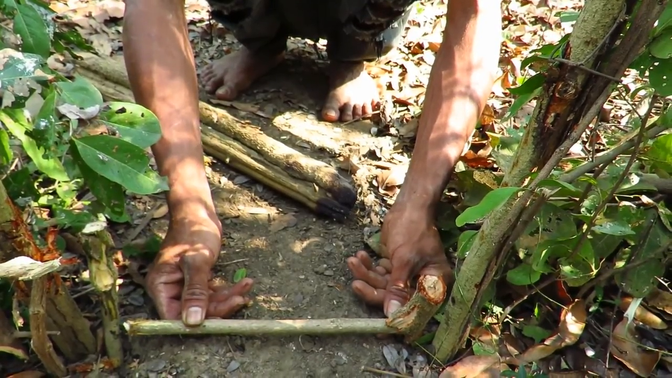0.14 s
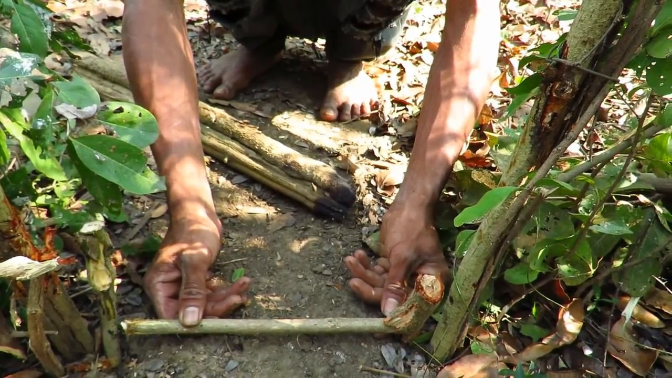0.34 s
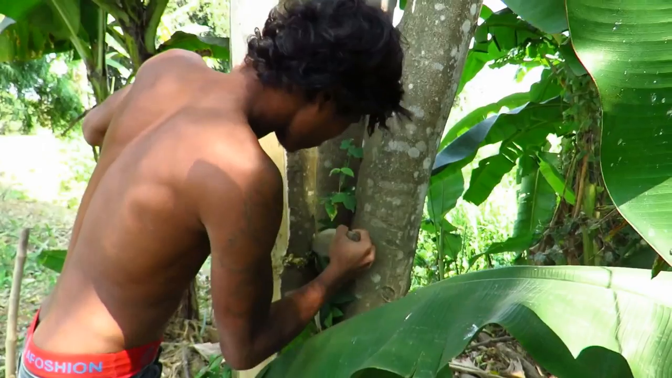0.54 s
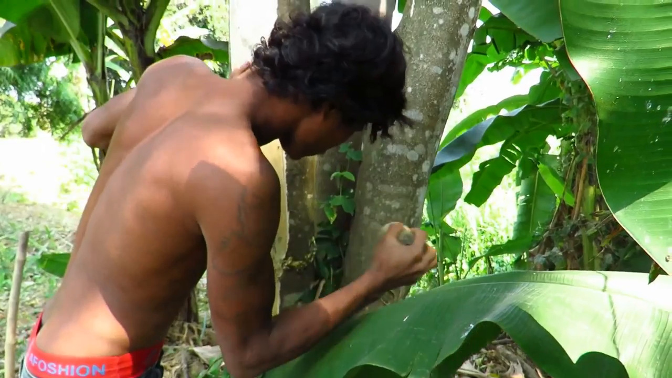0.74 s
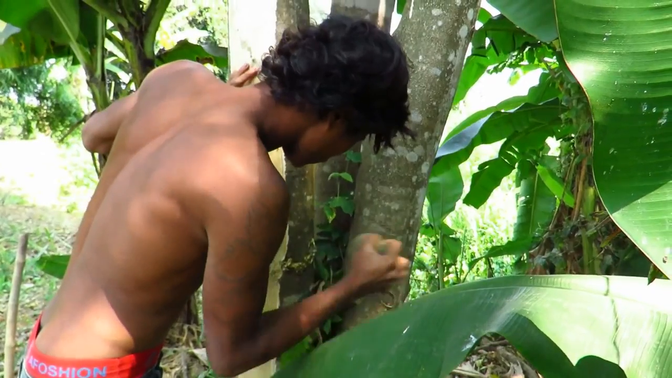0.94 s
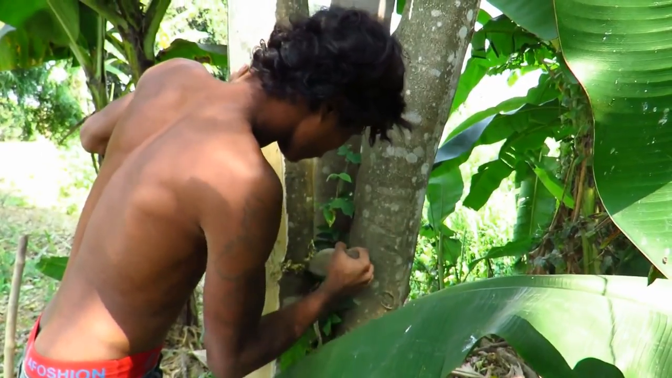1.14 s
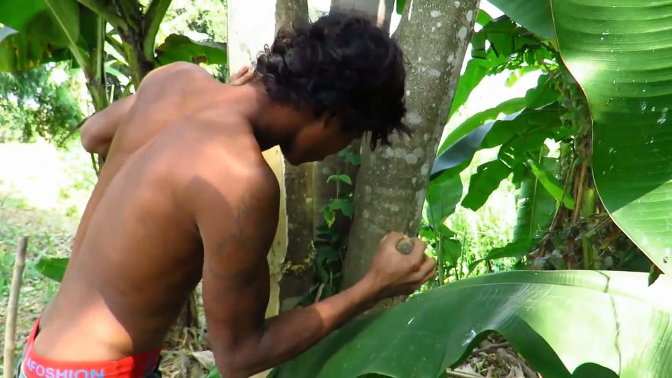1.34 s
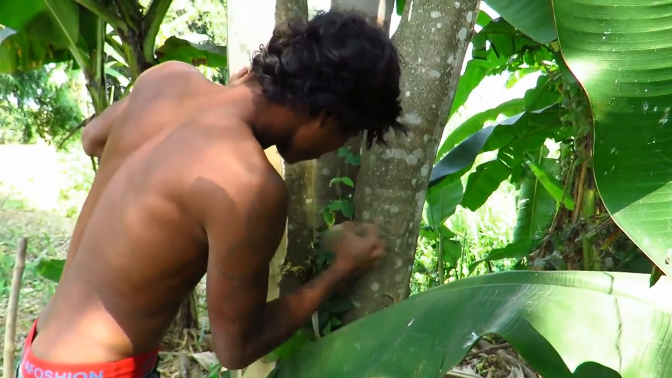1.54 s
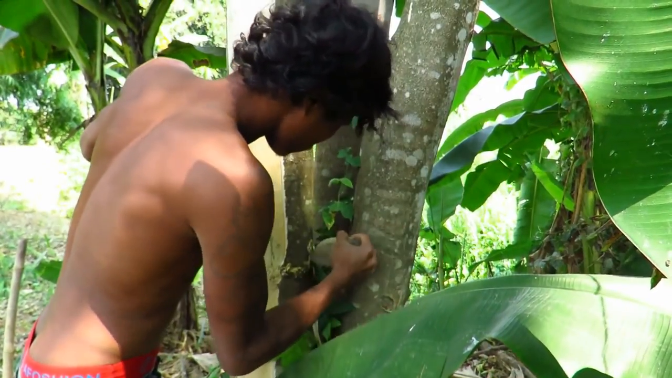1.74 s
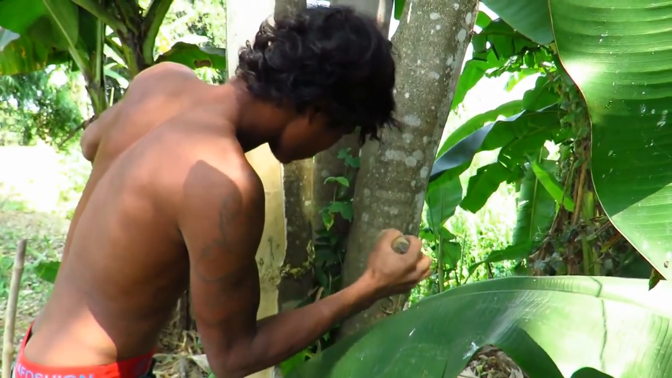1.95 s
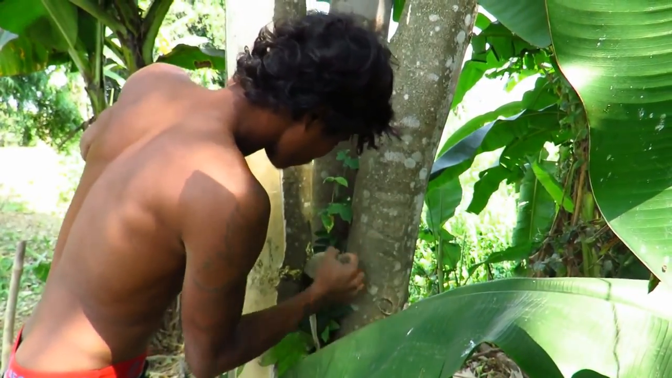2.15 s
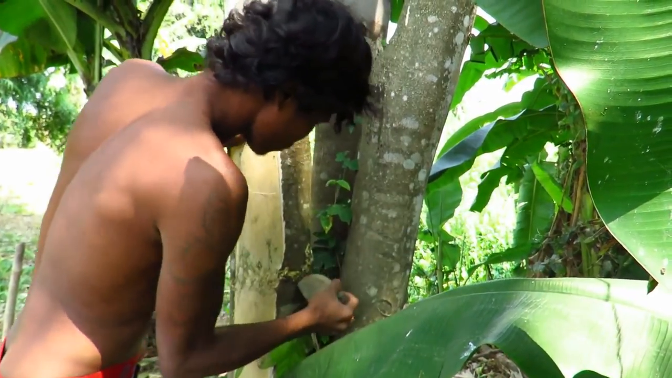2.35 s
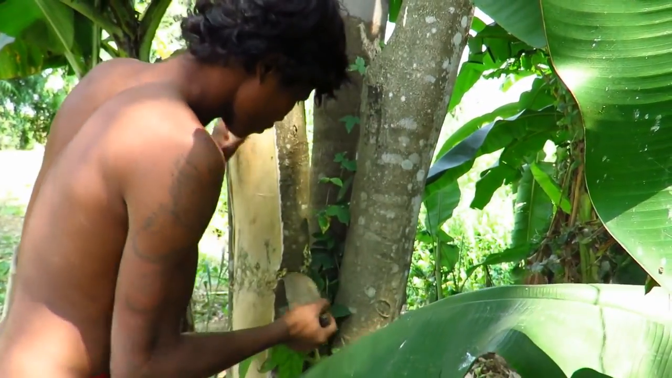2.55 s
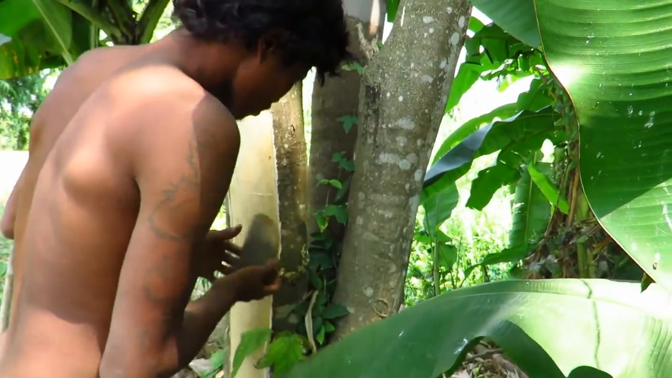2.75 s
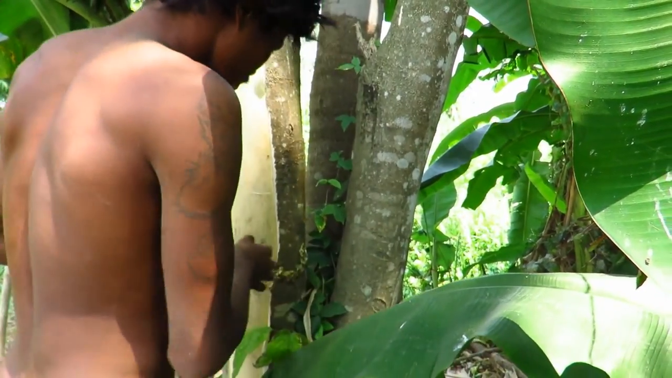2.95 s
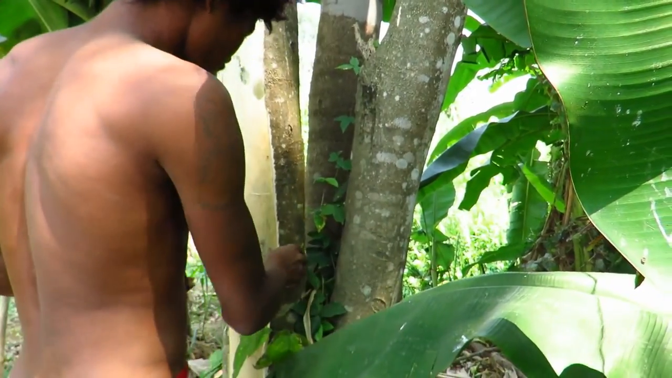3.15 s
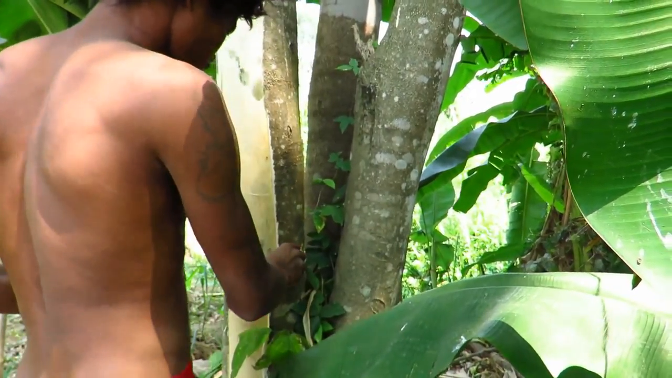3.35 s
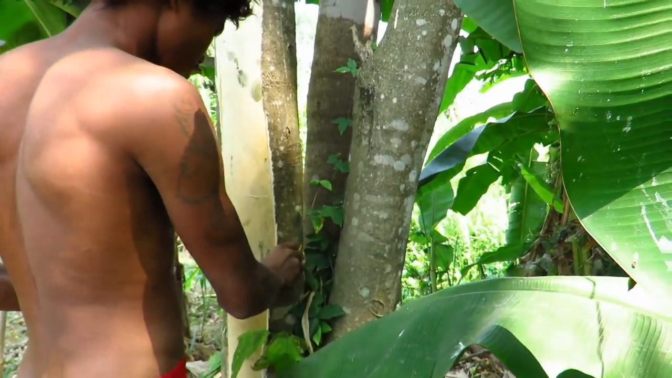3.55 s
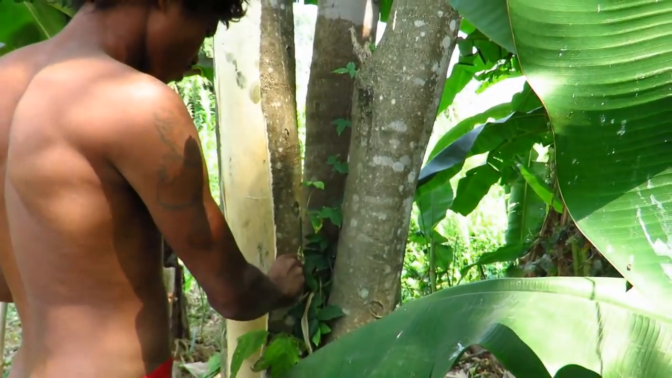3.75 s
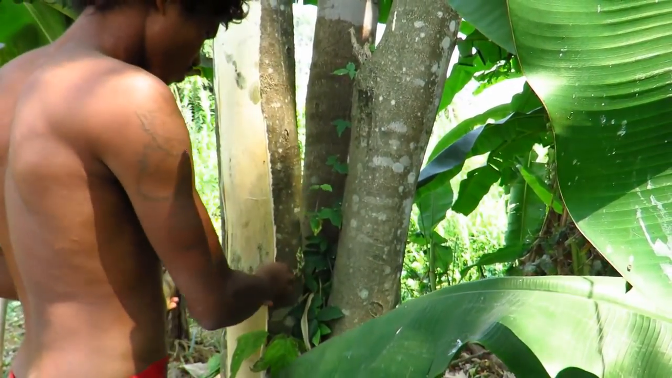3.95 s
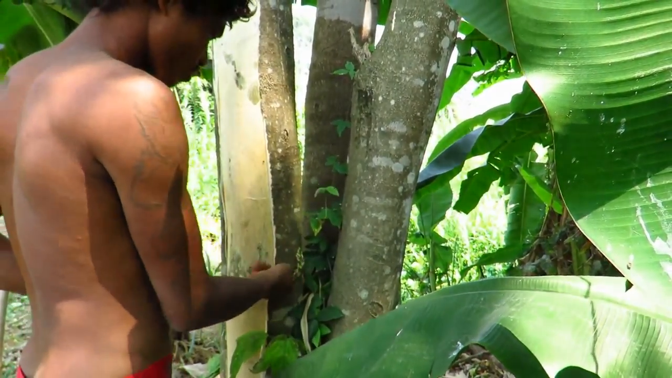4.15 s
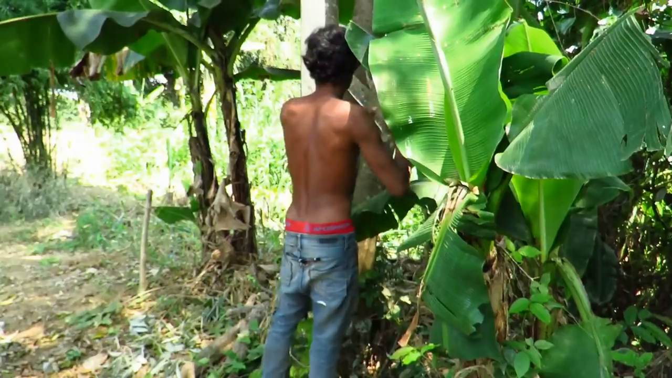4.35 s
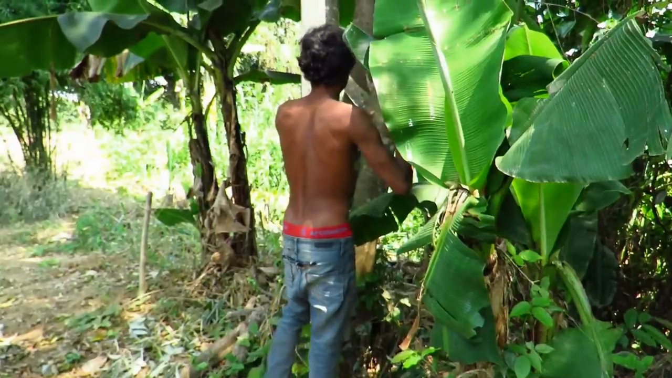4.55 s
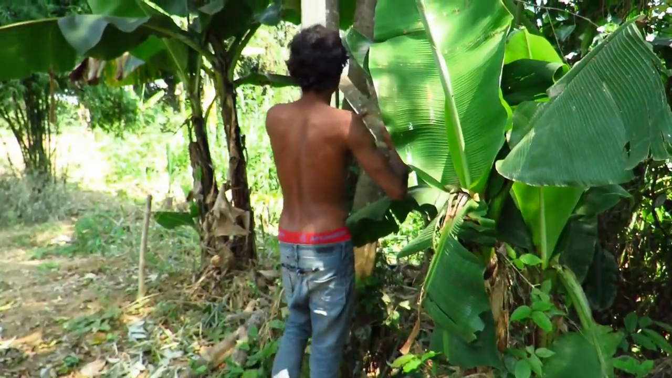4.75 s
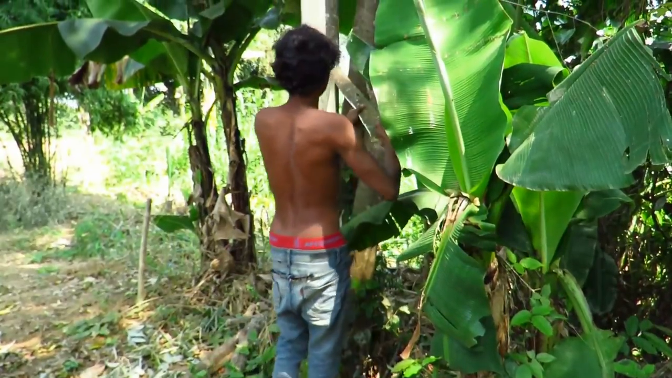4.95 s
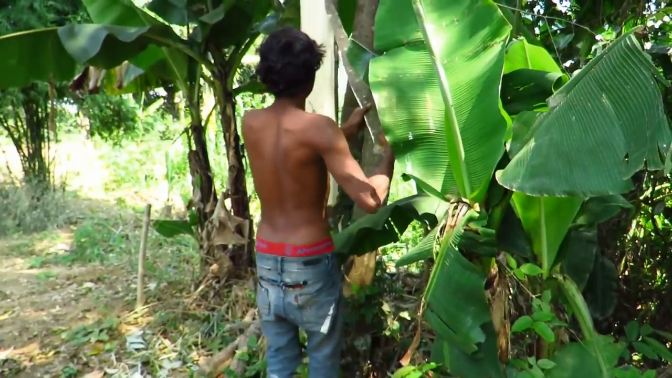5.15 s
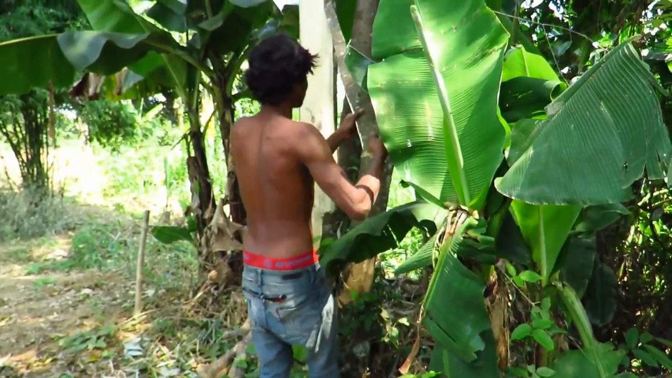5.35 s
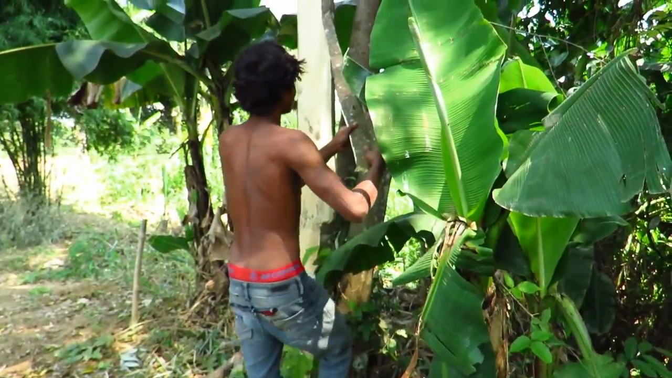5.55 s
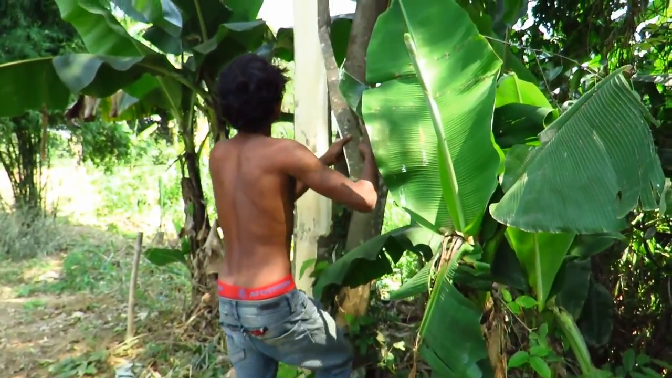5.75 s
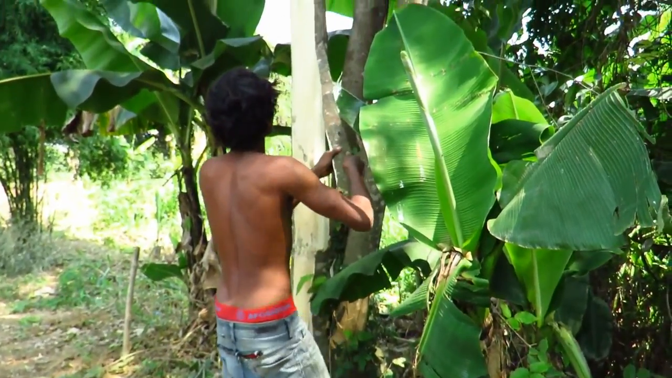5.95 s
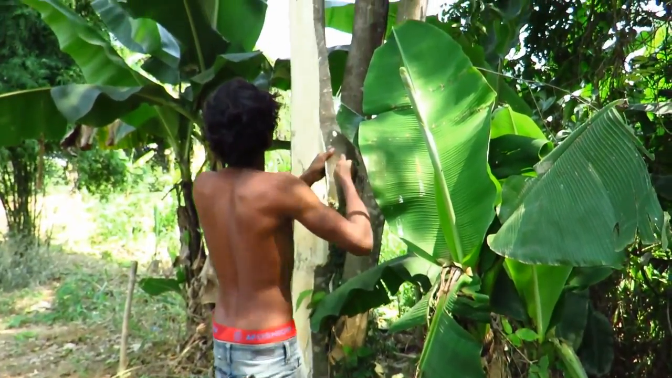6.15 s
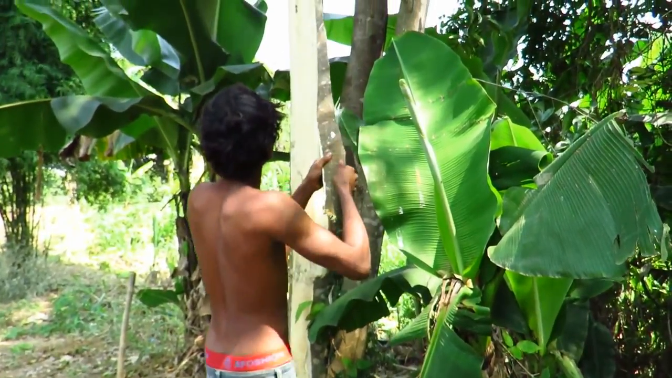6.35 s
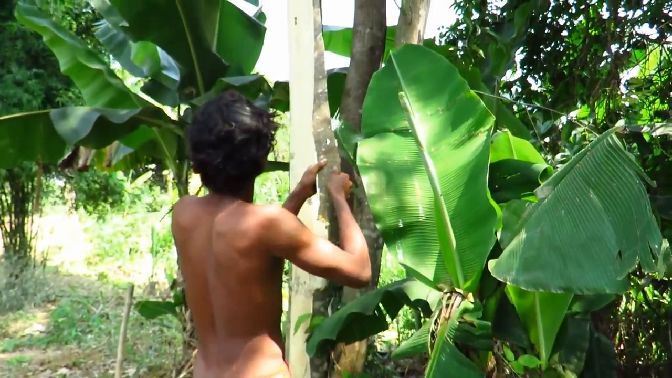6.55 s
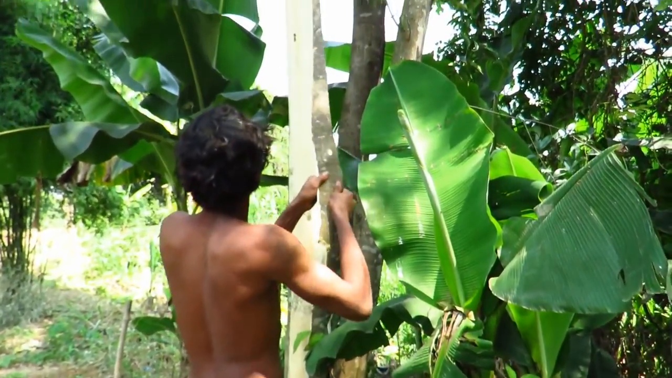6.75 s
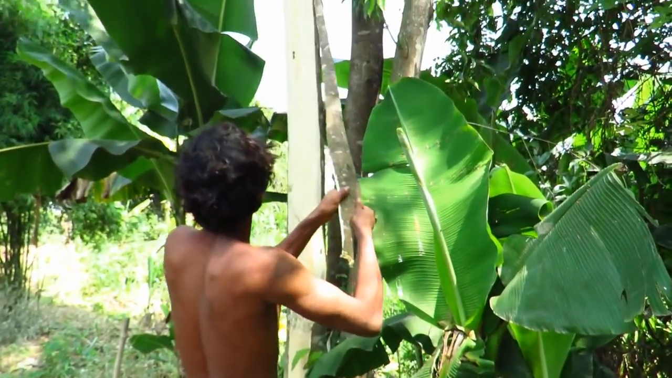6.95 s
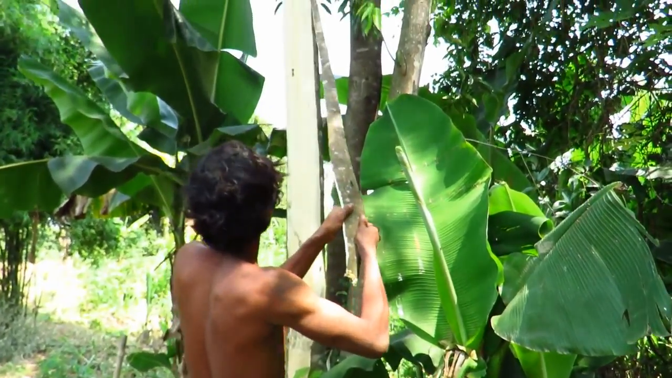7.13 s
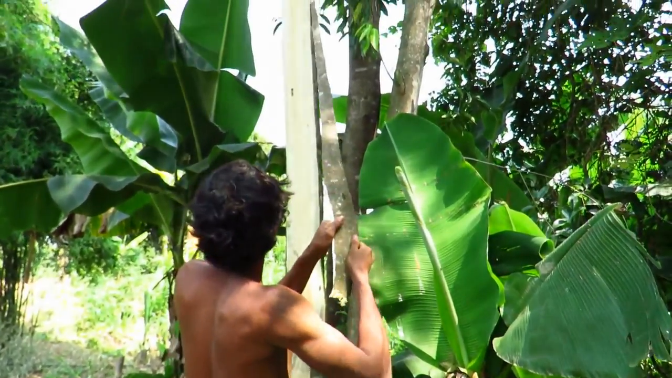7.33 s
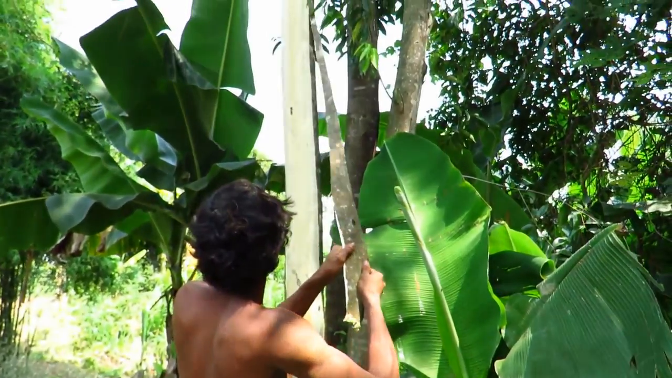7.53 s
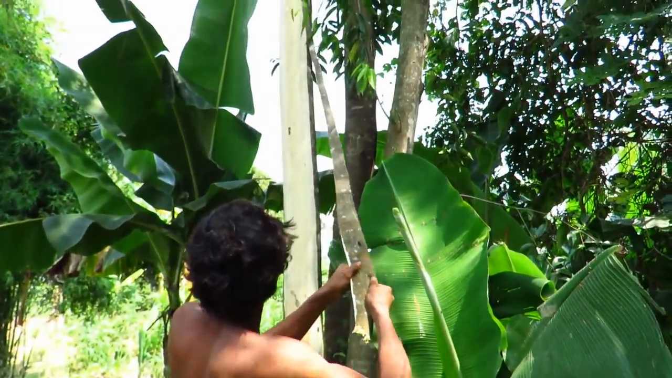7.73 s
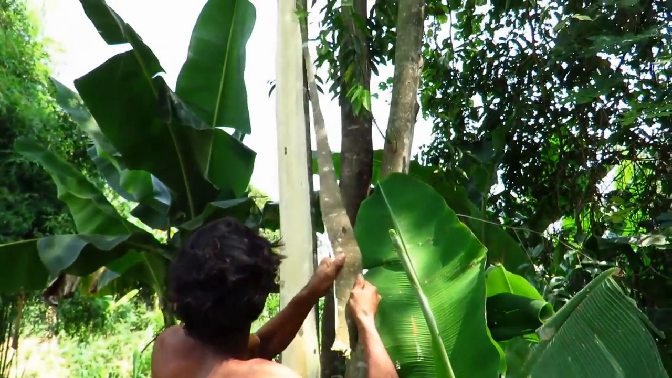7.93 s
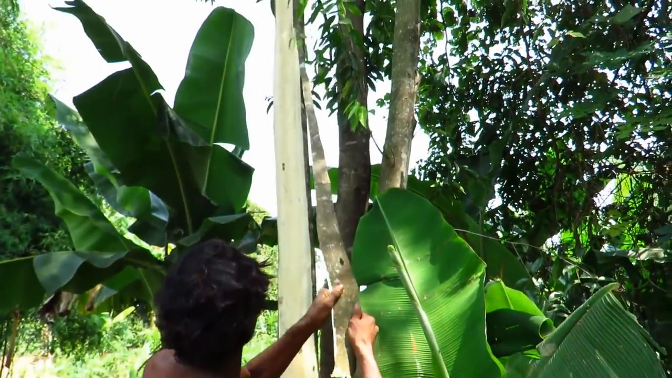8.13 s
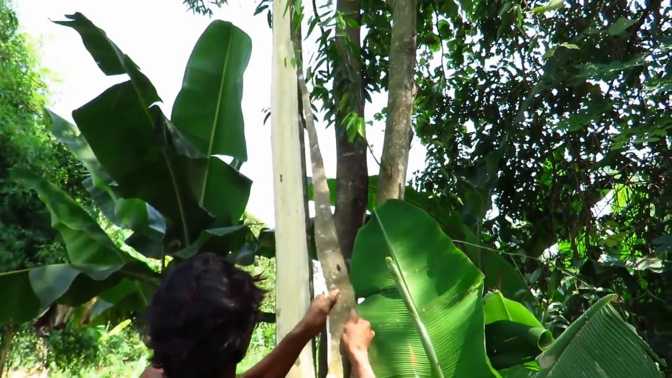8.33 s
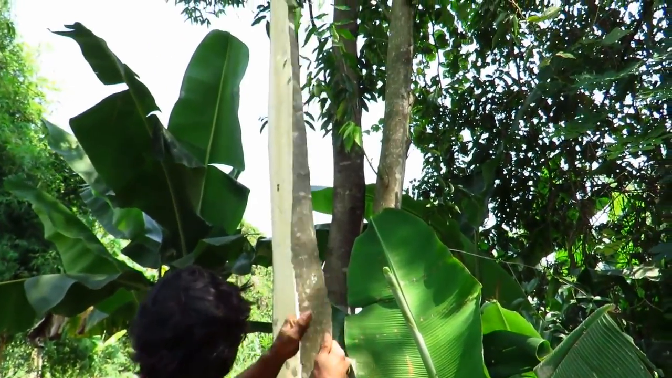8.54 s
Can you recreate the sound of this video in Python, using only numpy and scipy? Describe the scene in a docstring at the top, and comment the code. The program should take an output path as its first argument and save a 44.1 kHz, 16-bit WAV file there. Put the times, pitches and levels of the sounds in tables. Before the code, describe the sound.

A hand-held stone thuds four times into a trunk among trees, followed by crisp bark cricks and seven snapping, tearing pulls over faint insects.

```python
"""Stone blade and bark in the woods

After a short opening and a cut, a hand-held stone blade chops four times into a standing trunk ahead;
neighbouring trees throw the thuds back. Dry pieces crick as the bark is prised loose, then it rips upwards
in seven pulls of snapping fibres. Leaves hiss, insects shrill near 7 kHz, light wind bumps the microphone.
Blows are damped sines and short noise, tears are uneven impulses; loud blows turn the gain down."""
import sys
import numpy as np
from scipy import signal
from scipy.fft import rfft, irfft, next_fast_len
from scipy.io import wavfile
from scipy.ndimage import uniform_filter1d, minimum_filter1d, map_coordinates

SR = 44100
rng = np.random.default_rng(int(sys.argv[2]) if len(sys.argv) > 2 else 0)


def waveform_to_disk(signal):
    """Save audio, clipped to [-1, 1], as 16-bit WAV at the path in sys.argv[1]."""
    frames = np.transpose(np.atleast_2d(signal))
    scaled = np.clip(frames, -1, 1) * 32767
    samples = np.round(scaled).astype(np.int16)
    wavfile.write(sys.argv[1], SR, samples)


N = 383229  # samples, 8.69 s


def amp(db):
    """Decibels to gain."""
    return 10 ** (np.asarray(db) / 20)


def unit(x):
    """Scaled to rms 1."""
    return x / np.sqrt(np.mean(x ** 2) + 1e-20)


def along(points, hz):
    """(frequency [Hz], value) points read on a log frequency axis."""
    f, v = np.transpose(points)
    return np.interp(np.log(hz + 1), np.log(f + 1), v)


def level_curve(points):
    """A gain per sample through (time [s], level [dB]) points, silent outside them."""
    s, db = np.transpose(points)
    return amp(np.interp(np.arange(N) / SR, s, db, left=-np.inf, right=-np.inf))


def add(track, s, sound):
    """Mix a sound in at a time in seconds."""
    room = track[..., max(round(s * SR), 0):]
    count = min(room.shape[-1], sound.shape[-1])
    room[..., :count] += sound[..., :count]


def filtered(x, response):
    """x times a response of frequency."""
    m = next_fast_len(x.shape[-1] + SR // 5)
    spectrum = rfft(x, m) * response(np.fft.rfftfreq(m, 1 / SR))
    return irfft(spectrum, m)[..., :x.shape[-1]]


def coloured(x, points):
    """A causal, minimum-phase filter with the given (frequency [Hz], level [dB]) shape."""
    size = 4096
    shape = amp(along(points, np.fft.rfftfreq(size, 1 / SR)))
    cepstrum = irfft(np.log(np.maximum(shape, 1e-6)))
    # folding the cepstrum forward in time makes the filter causal
    cepstrum[1:size // 2] *= 2
    cepstrum[size // 2 + 1:] = 0
    return signal.oaconvolve(x, irfft(np.exp(rfft(cepstrum))))[:len(x)]


def hiss(points):
    """Coloured noise of rms 1."""
    return unit(coloured(rng.standard_normal(N), points))


def fade(t, t60):
    """An exponential decay, 60 dB down after t60 seconds."""
    return np.exp(-np.log(1000) * t / t60)


def ring(modes, t, pitch, attack):
    """Damped sines that swell over the contact time."""
    modes_sum = sum(amp(db) * np.sin(2 * np.pi * hz * pitch * t) * fade(t, t60) for hz, db, t60 in modes)
    return modes_sum * (1 - np.exp(-t / attack))


def crackle(count, rate, scatter_db, order):
    """Impulses at uneven gaps and sizes, rms 1; a higher order spaces them more evenly."""
    draws = rng.random((count // 8, order + 2))
    gaps = -np.log(draws[:, 2:]).mean(axis=1)
    at = np.cumsum(gaps) * SR / rate
    size = amp(scatter_db * draws[:, 0]) * np.sign(draws[:, 1] - .5)
    return unit(np.bincount(at[at < count].astype(int), size[at < count], count))


def burst(t, t60):
    """A short train of tiny breaks with an even spectrum and energy 1."""
    z = rfft(rng.standard_normal(len(t)) * fade(t, t60) * (1 - np.exp(-t / 0.00045)))
    power = np.abs(uniform_filter1d(np.abs(z) ** 2, size=160))
    even = irfft(z / np.sqrt(power + 1e-12), len(t))
    return even / np.linalg.norm(even)


def wobble(rate):
    """A smooth random curve, rate knots a second."""
    return map_coordinates(rng.standard_normal(400), [np.arange(N) * rate / SR], mode="wrap")


def scattered(x, t60):
    """x smeared by a short random ring of energy 1, which changes as the breaking point moves on."""
    hop, ring_size = SR // 60, SR // 40
    t = np.arange(ring_size) / SR
    pieces = np.pad(x, (0, -len(x) % hop)).reshape(-1, hop)
    tails = rng.standard_normal((len(pieces), ring_size)) * fade(t, t60)
    rung = signal.fftconvolve(pieces, tails / np.linalg.norm(tails, axis=1, keepdims=True), axes=1)
    at = hop * np.arange(len(rung))[:, None] + np.arange(rung.shape[1])
    return np.bincount(at.ravel(), rung.ravel())[:len(x)]


def spread(mid, side, alike):
    """Stereo from two unrelated signals, with a given likeness of left and right."""
    likeness = lambda hz: np.clip(along(alike, hz), 0, .999)
    side = filtered(side, lambda hz: np.sqrt((1 - likeness(hz)) / (1 + likeness(hz))))
    return np.array([mid + side, mid - side])


# distant foliage, swelling slowly: (time [s], level [dB])
LEAF_LEVELS = [(0, -55.5), (.47, -55), (.5, -52.5), (6, -51.5), (8.69, -48)]
# its dull hiss: (frequency [Hz], relative level [dB])
LEAF_COLOUR = [(20, -20), (45, -4.5), (150, -3.5), (420, -2.5), (900, -6.5), (1060, -5.5), (1300, -7.5),
               (3000, -12), (5500, -19), (8000, -25.5), (10000, -28), (13500, -32.5), (16000, -55)]
# likeness of left and right for sound from all around, read as 0 where negative: (frequency [Hz], likeness)
AROUND_ALIKE = [(60, 1), (180, -3.5), (550, -0.85), (1650, 0.68), (4970, 0.6), (15000, -0.088)]


def leaves():
    """Far leaves add up to a steady wide hiss."""
    level = level_curve(LEAF_LEVELS)
    return spread(level * hiss(LEAF_COLOUR), level * hiss(LEAF_COLOUR), AROUND_ALIKE)


# the shrill band of the insects: (frequency [Hz], relative level [dB])
INSECT_COLOUR = [(5200, -37.5), (6100, -3), (6600, 5), (6950, 3), (7400, -5.5), (8200, -56)]
INSECT_START_S, INSECT_DB, INSECT_GROWTH_DB_PER_S, INSECT_WAVER_DB = .5, -61.5, 0.29, 0.5


def insects():
    """A chorus too dense to tell apart: narrow-band noise that slowly grows and wavers."""
    t = np.arange(N) / SR
    swell = amp(INSECT_DB + INSECT_GROWTH_DB_PER_S * t + INSECT_WAVER_DB * wobble(2.23))
    level = (t > INSECT_START_S) * swell
    return spread(level * hiss(INSECT_COLOUR), level * hiss(INSECT_COLOUR), AROUND_ALIKE)


# spells of breeze at the microphone: (start [s], end [s], level [dB])
WIND = [(0, 0.477, -51.5), (6.128, 8.69, -54.5)]
# its low rumble: (frequency [Hz], relative level [dB])
WIND_COLOUR = [(20, -30), (45, 9.5), (75, 8), (120, 1.5), (200, -7.5), (500, -68)]
# the strongest bumps on the microphone: (centre [s], peak [dB], frequency [Hz], half length [s])
BUMPS = [(6.22, -36.5, 88, 0.011), (6.542, -27.5, 109, 0.0046), (7.556, -33.5, 120, 0.0049),
         (7.593, -39, 101, 0.0077), (7.747, -37, 91.5, 0.01), (7.995, -31, 138, 0.0048),
         (8.374, -32, 78, 0.011), (8.476, -42, 90, .014)]


def wind():
    """Light turbulence buffets the microphone as low noise, with a few single bumps."""
    now = np.arange(N) / SR
    spells = sum(amp(db) * ((now >= start) & (now < end)) for start, end, db in WIND)
    buffet = uniform_filter1d(spells, size=2048)
    # each side of the microphone meets different eddies
    out = spread(buffet * hiss(WIND_COLOUR), buffet * hiss(WIND_COLOUR), [(40, 0.49), (150, 0.23)])
    t = np.arange(-SR // 20, SR // 20) / SR
    for s, db, hz, half_length in BUMPS:
        add(out, s + t[0], amp(db) * np.cos(2 * np.pi * hz * t) * np.exp(-(t / half_length) ** 2))
    return out


SMALL_CRICKS_PER_S = 14
SMALL_CRICK_HZ = 1690  # middle pitch, drawn up to an octave either way
SMALL_CRICK_DB = 7  # mean lift over the scraping level


def small_cricks():
    """Rows like those of CRICKS at random times, following the effort of the strokes."""
    effort_db = 20 * np.log10(strokes() + 1e-9)
    draws = rng.random((300, 3))
    times = np.cumsum(.5 + draws[:, 0]) / SMALL_CRICKS_PER_S
    rows = []
    for s, (_, size, pitch) in zip(times, draws):
        if s < N / SR:
            db = effort_db[int(s * SR)] + 2 * SMALL_CRICK_DB * size
            rows.append((s, db, SMALL_CRICK_HZ * 2 ** (2 * pitch - 1), -np.inf))  # no knock
    return [row for row in rows if row[1] > -45]


# dry twigs and loosened bark crack as they bend; the row at 2.731 s is a soft knock of the stone blade on the
# wood: # (time [s], relative peak [dB], frequency of the ringing piece [Hz], relative knock level [dB])
CRICKS = [(0.063, -44, 568, -44), (0.162, -46, 433, -47), (0.223, -43, 350, -49), (0.45, -50, 355, -48),
          (2.644, -26, 1050, -55), (2.731, -16.5, 662, -35), (2.762, -22.5, 2690, -47),
          (2.799, -22, 3140, -45), (2.941, -23, 3550, -46), (2.951, -21.5, 3080, -56),
          (3.045, -30.5, 404, -55), (4.881, -26.5, 2670, -47.5), (4.931, -31, 1250, -47),
          (4.977, -21, 2540, -52), (4.999, -23, 2600, -46), (5.072, -29, 2430, -43),
          (5.151, -18, 2430, -47), (5.442, -28.5, 1643, -54), (5.89, -33, 1894, -62),
          (6.22, -25, 2280, -50), (6.24, -17.5, 1420, -48), (7.813, -32.5, 568, -53)]
# resonances of the bark: (frequency [Hz], width [Hz], relative level [dB])
BARK = [(1480, 1000, 5.5), (1980, 220, 7), (2700, 220, 8.5), (4320, 1400, 3.5), (5770, 1600, 1),
        (10500, 5800, -39)]
CRICK_DB, KNOCK_DB = -1.5, 5  # added to every row
PIECE_DB, PIECE_WIDTH_HZ = 18, 120  # how strongly and how broadly a cracking piece rings


def cricks():
    """Each crack is a tiny cluster of breaks: the piece rings at its own pitch and knocks the wood behind it."""
    out, t = np.zeros(N), np.arange(SR // 10) / SR
    resonance = lambda f, hz, width: 1j * f * width / (hz * hz - f * f + 1j * f * width)
    # neighbouring resonances alternate in sign
    body = lambda f: sum((-1) ** k * amp(db) * resonance(f, hz, w) for k, (hz, w, db) in enumerate(BARK))
    for s, db, hz, knock_db in list(CRICKS) + small_cricks():
        breaks = (t == 0) + 0.17 * rng.standard_normal(len(t)) * fade(t, 0.03)
        click = filtered(breaks, lambda f: body(f) + amp(PIECE_DB) * resonance(f, hz, PIECE_WIDTH_HZ))
        knock = amp(knock_db + KNOCK_DB) * ring(TRUNK, t, 0.97, attack=0.0012)
        add(out, s + 0.001008, amp(db + CRICK_DB) * click / np.abs(click).max() + knock)
    return out


# blows: (time [s], relative thud [dB], ring [dB], crack [dB] and splinter [dB] levels,
#         thud pitch [ratio], cut pitch [ratio])
CHOPS = [(0.5647, -6, -6.5, -8.5, -21.5, 1.005, 1.0), (1.149, -2, -7.5, -10.5, -31.5, 1.04, 1.02),
         (1.7235, -5, -21, -14.5, -22.5, 1.01, 1.03), (2.3082, 1.5, -20, -16, -28.5, 1.06, 1.0)]
# the edge bites differently each time, one list a blow: (frequency [Hz], relative level [dB])
CRACK_COLOURS = [
    [(200, -18), (650, 2), (1200, 3.5), (2500, 9), (4000, 0), (5000, -7), (6200, -8.5), (9000, -11.5),
     (10500, -2.5), (16000, -28)],
    [(200, 3), (550, 10.5), (800, -19.5), (1300, 6), (2000, 4.5), (3000, -2.5), (4400, -6.5), (5500, -17),
     (10500, -16), (16000, -27)],
    [(200, -10), (520, 7.5), (1000, -16), (1700, 1.5), (2700, 0), (4000, -9.5), (5200, -15), (8000, -20.5),
     (12000, -17.5), (16000, -28)],
    [(200, -3), (600, 1), (950, 5), (1500, -2), (2300, -10), (3700, -1), (5500, -23), (8000, -16),
     (13000, -12), (16000, -28)],
]
# modes of the struck trunk, which the cricks knock too: (frequency [Hz], relative level [dB], t60 [s])
TRUNK = [(78, -31.5, 0.245), (120, -8.5, 0.035), (176.5, -33, 0.28), (248.2, 8, 0.021), (332, -16.5, 0.034),
         (506, -19.5, 0.045), (612, -19, 0.036)]
# modes of bark and blade at the cut: (frequency [Hz], relative level [dB], t60 [s])
CUT = [(1132, -3.5, 0.032), (1526, -2, 0.019), (1645, -5, 0.029), (1864, -17, 0.078), (2520, -30, 0.011),
       (2590, -6.5, 0.026)]
# crushed wood, duller than the crack: (frequency [Hz], relative level [dB])
SPLINTER_COLOUR = [(40, -34), (150, -33), (300, 1), (600, 11), (3000, -7.5), (6000, 4), (14000, -36)]


def chops():
    """The edge bites with a crack, the trunk thuds, and crushed wood splinters briefly."""
    out, t = np.zeros(N), np.arange(SR // 3) / SR
    for blow, colour in zip(CHOPS, CRACK_COLOURS):
        s, thud_db, ring_db, crack_db, splinter_db, pitch, cut_pitch = blow
        crush, graze = [unit(coloured(noise, colour)) for noise in rng.standard_normal((2, len(t)))]
        thud = amp(thud_db + 6) * ring(TRUNK, t, pitch, attack=0.0042)
        cut = amp(ring_db) * ring(CUT, t, cut_pitch, attack=0.0026)
        bite = coloured(burst(t, t60=0.014) * fade(t, 0.18), colour)
        crack = amp(crack_db + 18) * bite / np.linalg.norm(bite)
        splinters = amp(splinter_db + 2.5) * unit(coloured(crush, SPLINTER_COLOUR)) * fade(t, 0.096)
        add(out, s, thud + splinters)
        add(out, s + 0.000932, crack + cut)
        # the edge grazes the outer bark just before it lands
        add(out, s - .002, amp(-23) * graze * fade(t, 0.005))
    # a slim trunk radiates little deep bass
    return coloured(out, [(20, -39), (45, -16.5), (75, -3), (200, -0.5)])


# nearby trunks throw the blows back: (delay [s], relative level [dB])
TREE_ECHOES = [(0.0191, -19), (0.0263, -45), (0.0317, -20.5), (.0435, -36.5), (0.0493, -26)]
# trunk, shoulder and ground reflect the bark: (delay [s], relative level [dB])
CLOSE_ECHOES = [(.0013, -34), (.0034, -40.5), (.0078, -16)]


def echoes(x, paths):
    """Longer paths to the microphone bring delayed, weaker copies of a sound."""
    out = np.zeros(N)
    for delay, db in paths:
        add(out, delay, amp(db) * x)
    return out


# decay among the trees: (frequency [Hz], t60 [s])
FOREST = [(100, 0.52), (300, 0.33), (1500, 0.32), (5000, 0.48), (14000, 0.15)]


def forest(x, width):
    """Foliage scatters a faint tail, fullest near 130 Hz, whose very top dies first."""
    hz, t, z = signal.stft(rng.standard_normal((2, SR // 2)), SR, nperseg=256)
    mid, side = signal.istft(z * fade(t, along(FOREST, hz)[:, None]), SR, nperseg=256)[1]
    tail = np.array([mid + width * side, mid - width * side]) / np.linalg.norm(mid)
    sent = coloured(x, [(60, -20), (130, 12), (220, -5.5), (16000, 2)])
    late = np.pad(sent, (SR // 100, 0))  # the tail starts 10 ms late
    return signal.fftconvolve(late[None], tail, axes=1)[:, :N]


# strokes of hand and blade under the bark:
# (time of greatest effort [s], level there [dB], swell over STROKE_RANGE_DB [s], fade over it [s])
SCRAPES = [(2.64, -39, 0.11, 0.46), (2.763, -33, 0.15, 0.13), (2.945, -46, 0.3, 0.19),
           (4.69, -46.5, 0.37, 0.32), (4.965, -39.5, 0.28, 0.19), (5.09, -42.5, .04, 0.1),
           (5.155, -37.5, 0.017, 0.12), (5.495, -41.5, 0.034, 0.092), (5.59, -42, 0.24, 0.54),
           (7.135, -37.5, 0.083, 0.094)]
STROKE_RANGE_DB = 20


def strokes():
    """Scraping effort swells and fades with each stroke, evenly in dB; the strongest stroke counts."""
    t = np.arange(N) / SR
    levels = []
    for s, db, swell, fading in SCRAPES:
        levels.append(db - STROKE_RANGE_DB * np.maximum((s - t) / swell, (t - s) / fading))
    return amp(np.max(levels, axis=0))


# the scraped bark: (frequency [Hz], relative level [dB])
SCRAPE_COLOUR = [(90, -30), (170, -18), (300, -4.5), (500, -12), (850, -4.5), (1400, -7.5), (2000, -6),
                 (2700, -5.5), (3600, -10.5), (5000, -12.5), (8000, -20.5), (12500, -23), (15500, -40)]


def scrapes():
    """Dry grains rub and ring the bark as it is levered away."""
    rub = crackle(N, rate=1200, scatter_db=13, order=1) + .6 * rng.standard_normal(N)
    grains = unit(coloured(rub + 0.74 * scattered(rub, t60=0.033), SCRAPE_COLOUR))
    return strokes() * grains


# a leaf slides past: (time [s], level [dB])
LEAF_BRUSH = [(3.72, -88), (3.83, -53), (3.87, -57)]


def leaf_brush():
    """One leaf brushes by as a short swell of soft noise."""
    return level_curve(LEAF_BRUSH) * hiss([(400, -20), (1500, 8), (6000, -4), (12000, -6), (16000, -14)])


PULL_ATTACK_S = 0.0053
STOP_DB, STOP_S = 10.5, 0.016  # the quick drop as the tear halts


def pull_gain(t, length, db, rise_db, arch_db, release):
    """A pull catches quickly, arches with a tilt in level, then halts and dies away (release in dB/s)."""
    u, after = np.minimum(t / length, 1), np.maximum(t - length, 0)
    held_db = db + rise_db * (u - .5) + arch_db * (np.sin(np.pi * u) - .5)
    halt_db = STOP_DB * np.minimum(after / STOP_S, 1) + release * after
    return np.minimum(t / PULL_ATTACK_S, 1) * amp(held_db - halt_db)


# pulls on the bark: (time [s], length [s], relative fibre level [dB], its rise [dB], relative strip level [dB],
#                     its rise [dB], coarse fibres [per s], their level over the fine ones [dB])
PULLS = [(4.292, 0.16, -35.5, 5, -44, -3, 200, -17), (5.189, .16, -32.5, 4, -47.5, -5, 132, -10),
         (6.214, 0.26, -31.5, 12, -39, -4, 140, -6), (6.784, 0.15, -30.6, 11, -40.5, 4.5, 164, -4),
         (7.332, .081, -29, 15.5, -40, 15, 182, -2.5), (7.989, 0.056, -23, -8.5, -35.5, -6, 115, -6),
         (8.543, 0.13, -21, 4, -32.5, 5, 164, -8)]
# the strip sounds different at each length, one list a pull: (frequency [Hz], relative level [dB])
STRIP_COLOURS = [
    [(88, -36), (150, -3.5), (253, -10), (352, -4), (490, -18), (631, -11), (985, -6.5), (1270, -3),
     (2450, -5.5), (3830, -1), (9730, -7.5), (13300, -15), (15500, -38)],
    [(88, -40), (150, -25), (239, 0.5), (530, -21), (595, -4.5), (985, -11), (1630, -1.5), (2310, -9),
     (2600, -8), (2920, -9), (7000, -2), (12800, -16), (15500, -27)],
    [(88, -45), (150, -10.5), (320, -11.5), (530, -18.5), (736, -8), (1270, -10.5), (1540, -6.5),
     (1910, -10), (2310, -10), (3620, -6.5), (4750, -0.5), (7560, 3), (15500, -17.5)],
    [(88, -42), (150, -4), (209, -10), (471, -11), (894, 0), (1170, -7.5), (1540, 0.5), (2760, -17),
     (3100, -11), (3410, -15), (4840, -4), (5330, -5.5), (7710, -1.5), (12300, -8), (15500, -23)],
    [(88, -15), (150, -3), (471, -8), (844, 1.5), (1450, -4.5), (1570, -0.5), (1910, -2.5), (2230, -9),
     (2550, -8.5), (3350, -12.5), (4840, -2), (11100, -6), (15500, -20)],
    [(88, -52), (150, 0.5), (540, -15.5), (656, -5), (948, -8.5), (1220, -13), (1320, -7), (1450, -7.5),
     (2450, -10), (2700, -17), (3220, -4), (3480, -4.5), (4560, -2), (12500, -13), (15500, -26)],
    [(88, -47.5), (150, -9), (213, -7.5), (253, -8.5), (339, -5), (445, -18), (631, 3.5), (930, -6.5),
     (1220, -8), (1340, -6), (2650, -20.5), (2860, -20), (4750, -12), (12300, -27.5), (15500, -40)],
]
FIBRE_ARCH_DB, STRIP_ARCH_DB = 4, 4.5  # lifts the middle of a pull
FIBRE_RELEASE_DB_PER_S, STRIP_RELEASE_DB_PER_S = 289, 162
JUDDER_DB, JUDDERS_PER_S = 0.5, 55  # bark holds and gives by turns


def tears():
    """Coarse fibres let go in a stutter among countless fine ones; the strip rings with their low part."""
    out = np.zeros(N)
    count = SR * 2 // 5
    t = np.arange(count) / SR
    low_share = lambda hz: 1 / (1 + (hz / 2800) ** 8)
    for pull, colour in zip(PULLS, STRIP_COLOURS):
        s, length, fibre_db, fibre_rise_db, strip_db, strip_rise_db, rate, coarse_db = pull
        fibre_gain = pull_gain(t, length, fibre_db, fibre_rise_db, FIBRE_ARCH_DB, FIBRE_RELEASE_DB_PER_S)
        strip_gain = pull_gain(t, length, strip_db, strip_rise_db, STRIP_ARCH_DB, STRIP_RELEASE_DB_PER_S)
        fine = crackle(count, rate=2600, scatter_db=7.5, order=1) + 0.17 * rng.standard_normal(count)
        coarse = amp(coarse_db) * crackle(count, rate=rate, scatter_db=15, order=4)
        frayed = .7 * fine + .7 * scattered(fine + .5 * coarse, t60=.025)
        fibres = filtered(coloured(frayed + coarse, colour), lambda hz: np.sqrt(1 - low_share(hz)))
        strip = filtered(coloured(frayed + 0.54 * coarse, colour), lambda hz: np.sqrt(low_share(hz)))
        add(out, s, amp(-2.7) * fibre_gain * unit(fibres) + amp(1.5) * strip_gain * unit(strip))
    return out * amp(JUDDER_DB * wobble(JUDDERS_PER_S))


# the thickest fibres parting: (time [s], relative peak [dB])
SNAPS = [(5.2305, -28), (5.288, -20), (5.302, -20), (6.3145, -17), (6.3923, -18), (6.4234, -15),
         (6.4454, -13.5), (6.7662, -30), (6.793, -39), (6.9324, -31), (7.3238, -32), (7.3397, -23),
         (7.9992, -8), (8.0193, -14), (8.5535, -13.5), (8.649, -5)]
# their bright click: (frequency [Hz], relative level [dB])
SNAP_COLOUR = [(300, -45), (1500, -7), (2800, -28), (4500, 11.5), (7500, 5.5), (11000, -6.5),
               (16000, -10.5)]
SNAP_DB = 3  # added to every peak


def snaps():
    """A thick fibre parts with one sharp click and a short fray."""
    out, t = np.zeros(N), np.arange(SR // 30) / SR
    for s, db in SNAPS:
        fray = .2 * rng.standard_normal(len(t)) * fade(t, .01)
        click = coloured((t == 0) + fray, SNAP_COLOUR)
        add(out, s + .0007, amp(db + SNAP_DB) * click / np.abs(click).max())
    return out


# likeness of left and right for the close bark: (frequency [Hz], likeness)
BARK_ALIKE = [(40, 1), (150, 0.58), (600, 1), (3000, 1), (8000, 0.97), (14000, 0.78)]
CHOP_DB = 3


def scene():
    """All the work happens ahead of the microphone, among the trees."""
    blows = chops()
    # other trunks return mostly the low part of each blow
    low_blows = coloured(blows, [(100, 7.5), (380, 3.5), (800, -16), (4000, -27), (12000, -20)])
    direct = blows + echoes(low_blows, TREE_ECHOES)
    # left and right gains: the blows lean slightly to the right
    chopping = direct * amp([[-.45], [.45]]) + amp(-21.5) * forest(blows, width=0.3)
    bark = cricks() + scrapes() + leaf_brush() + tears() + snaps()
    bark = bark + echoes(bark, CLOSE_ECHOES)
    stripping = spread(bark, scattered(bark, t60=0.097), BARK_ALIKE) + amp(-20) * forest(bark, width=0.15)
    return leaves() + insects() + wind() + amp(CHOP_DB) * chopping + stripping


DUCK_ABOVE_DB, DUCK_SHARE, RECOVERY_DB_PER_S = -13, .5, 7  # the recorder's gain control


def ducked(x):
    """Gain control: a loud blow turns everything down at once, and the gain creeps back."""
    power = np.abs(uniform_filter1d(x.mean(axis=0) ** 2, size=441))
    level_db = 10 * np.log10(power + 1e-12)
    needed_db = minimum_filter1d(-DUCK_SHARE * np.maximum(level_db - DUCK_ABOVE_DB, 0), size=661)
    # a running minimum against a steady slope lets the gain climb only slowly
    recovery_db = RECOVERY_DB_PER_S * np.arange(N) / SR
    gain_db = np.minimum.accumulate(needed_db - recovery_db) + recovery_db
    return x * amp(uniform_filter1d(gain_db, size=128))


# the silent gap of an edit between the opening and the chopping scene: (start [s], end [s])
SCENE_CUT = (.47, .509)
TOP_HZ = 15850


def record(dry):
    """An edit leaves a silent gap before the chopping scene; gain ducks, peaks are rounded, the top is cut."""
    t = np.arange(N) / SR
    live = uniform_filter1d(1.0 * ((t < SCENE_CUT[0]) | (t > SCENE_CUT[1])), size=64)
    held = ducked(dry)
    rounded = held / (1 + np.abs(held) ** 8) ** (1 / 8)
    return filtered(rounded * live, lambda hz: hz < TOP_HZ)


dry = scene()
out = record(dry)
waveform_to_disk(out)
```